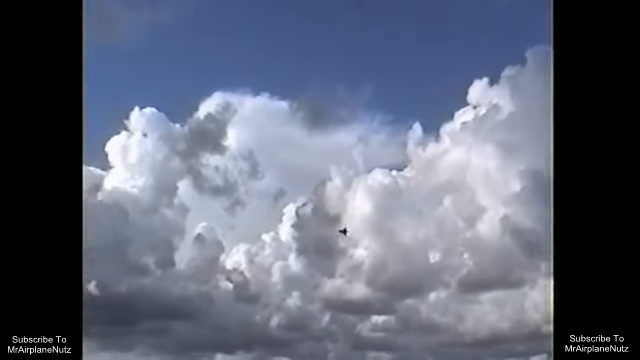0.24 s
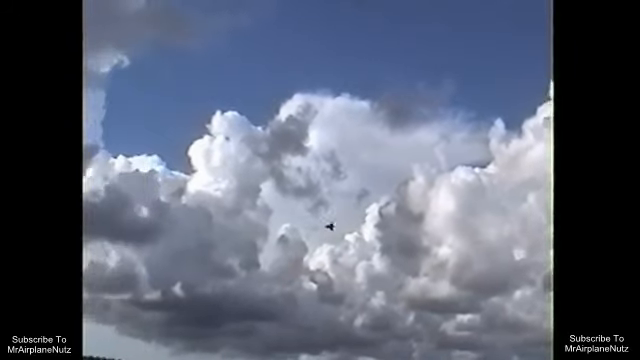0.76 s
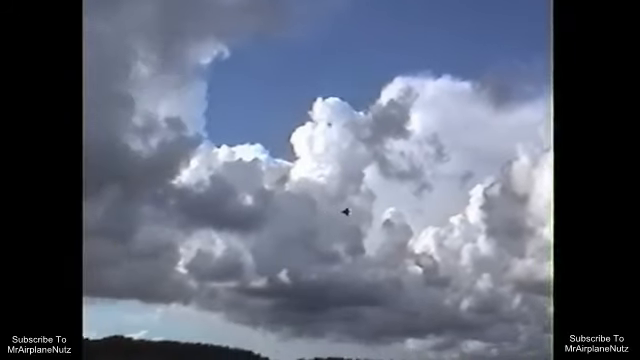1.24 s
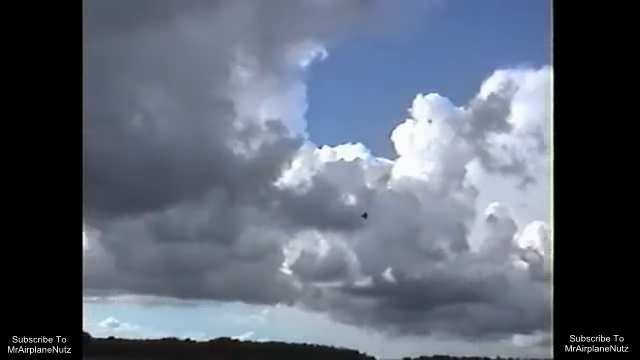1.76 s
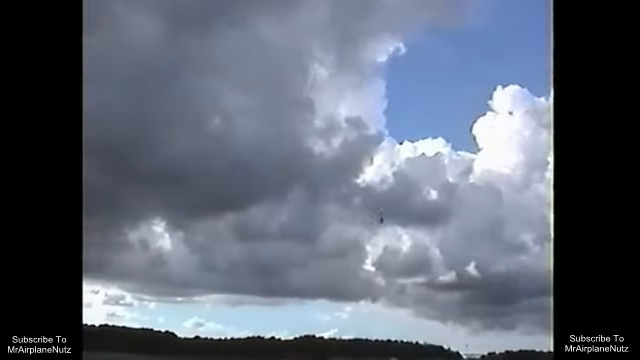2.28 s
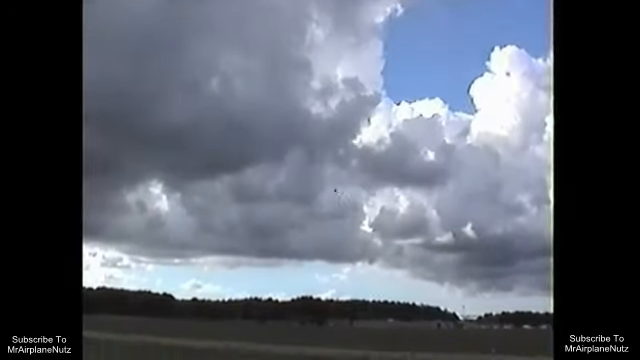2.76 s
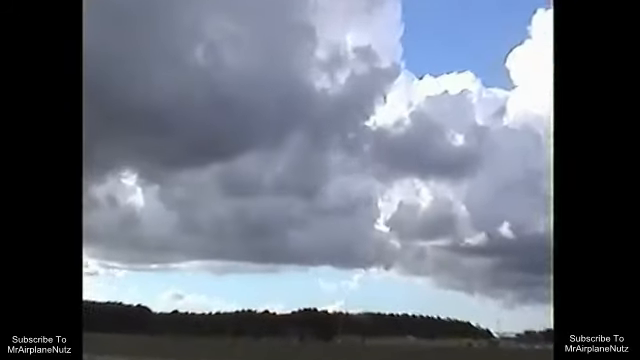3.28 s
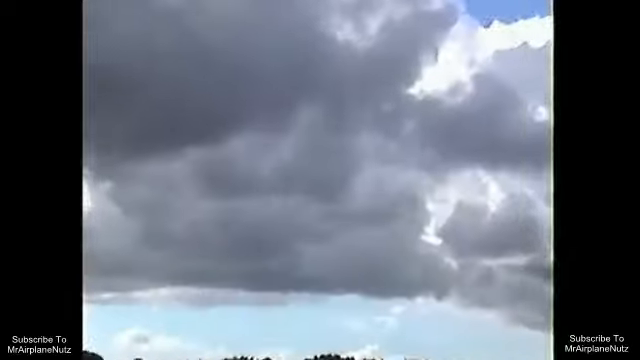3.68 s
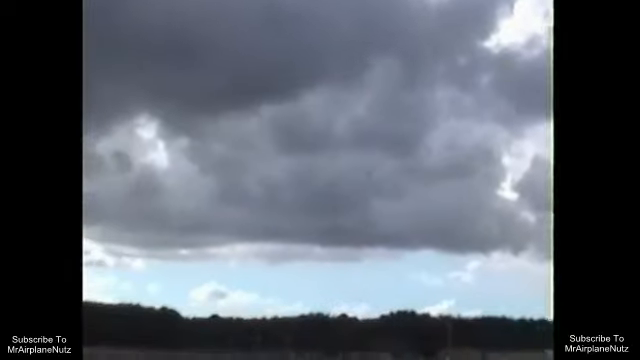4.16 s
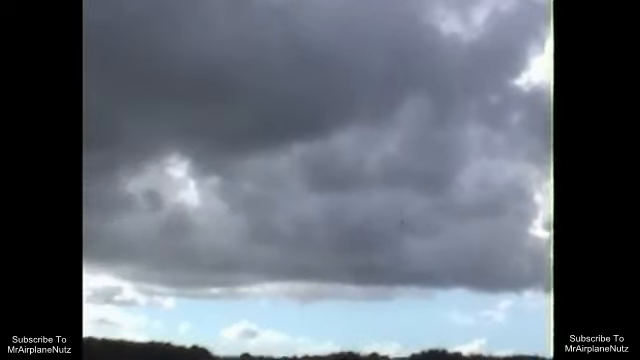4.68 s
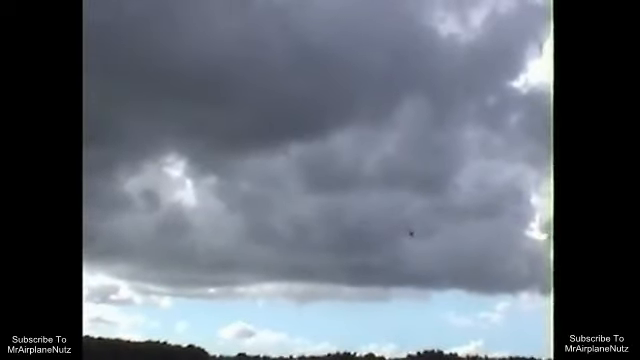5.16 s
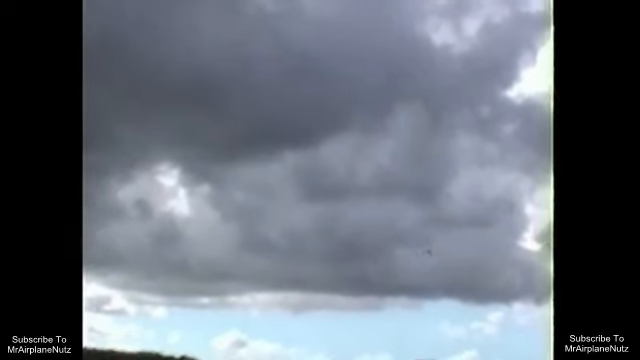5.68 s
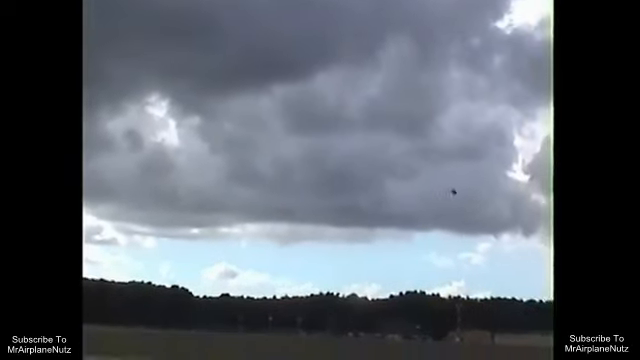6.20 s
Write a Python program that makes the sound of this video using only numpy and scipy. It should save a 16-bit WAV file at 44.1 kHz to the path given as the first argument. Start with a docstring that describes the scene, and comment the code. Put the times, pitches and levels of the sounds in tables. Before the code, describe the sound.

Outdoors on an open airfield, a single-engine jet fighter is already roaring at 0 seconds: dense, mid-heavy turbulent noise, with faint fizz and small sharp crackles from the overloaded microphone. Around 1.1 seconds it grows slightly louder and the colour turns broader and brighter, fluttering in gusty air. From 2 to 2.6 a narrow howl climbs through the roar, with a sharp crackle near 2.45, as the sound shifts to a fuller, rushing tail-on roar. At about 3.65 it jumps to its loudest, harsh and hissy, with thick crackle and two low thumps near 3.7 and 4.0. It drops after 4.1, then surges briefly around 5.05 with a cluster of snaps. From 5.3 to 6.4 it is quieter, darker and distant, still wavering. A weak breeze and very faint, high sinking whine lie underneath; peaks are squashed and extreme treble is missing.

```python
"""Over an open airfield, a single-engine jet fighter turns and draws away.
Its plume roars as shaped noise: the colour follows the angle it is heard from, and four registers surge in gusty air.
Narrow bands howl within the roar, and a breeze buffets the microphone.
The small microphone overloads with low thumps, sharp single crackles, a faint fizz and bouts of crackle.
A fast limiter holds the peaks, the recorder adds a thin, sinking whine, and the extreme top is cut off."""
import sys
import numpy as np
from scipy import signal
from scipy.fft import rfft, irfft, next_fast_len
from scipy.io import wavfile
from scipy.ndimage import uniform_filter1d, minimum_filter1d, map_coordinates

SR = 44100
rng = np.random.default_rng(int(sys.argv[2]) if len(sys.argv) > 2 else 0)


def wrap_up_sound(samples):
    """Save the sound to the file named by the first command line argument, as 16-bit audio."""
    columns = np.atleast_2d(samples).T
    # keep every value between -1 and 1, then stretch to whole-number steps
    tamed = np.clip(columns, -1, 1)
    steps = np.round(tamed * 32767).astype(np.int16)
    wavfile.write(sys.argv[1], SR, steps)


N = 283563
TIME = np.arange(N) / SR
PADDED = next_fast_len(N + 8192, real=True)
BINS = np.maximum(np.arange(PADDED // 2 + 1) * SR / PADDED, 1)   # Hz

# Colour of the breeze and the low thumps. Each row: frequency in Hz, relative level in dB per Hz.
LOW_COLOUR = [(40, -2.5), (130, 0.5), (300, -43)]
# Low thumps as the overloaded microphone bottoms out. Each row: centre in seconds, length in seconds, level in dB.
OVERLOAD_THUMPS = [(3.718, 0.095, -43), (3.993, 0.12, -42)]
# Sharp single crackles of the overloaded microphone. Each row: time in seconds, relative level in dB.
SHARP_CRACKLES = [(0.173, -30), (0.208, -44), (0.268, -28), (1.031, -32), (1.111, -33), (2.4515, -23),
                  (2.703, -40), (2.832, -36), (3.0826, -33), (3.411, -27), (3.424, -29), (4.3, -29),
                  (4.5506, -31), (4.583, -35), (4.974, -37), (5.0649, -34), (5.097, -26), (5.112, -29),
                  (5.139, -36), (6.2233, -44)]
# Colour of all the crackle. Each row: frequency in Hz, relative level in dB per Hz.
CRACKLE_COLOUR = [(2000, 9), (4000, 2.5), (5400, 3), (6200, -4.5), (7400, 1), (8300, -8), (9300, -5.5),
                  (10500, -12.5), (15500, -18.5)]
# Colour of the exhaust from four angles. Each row: frequency in Hz, relative level in dB per Hz.
NEARING_COLOUR = [(41, -74), (90, -36.5), (165, -11.5), (250, -28.5), (362, -22), (527, -10.5),
                  (1180, -1.5), (1460, -10.5), (1740, -9), (3140, -29.5), (3630, -36.5), (5000, -64),
                  (6500, -69)]
ABEAM_COLOUR = [(41, -62), (70, -45), (157, -18), (222, -24), (321, -19.5), (346, -14.5), (389, -11),
                (500, -3), (793, -0.5), (1020, -4.5), (1280, -3), (2720, -19.5), (3180, -20), (7000, -54),
                (9100, -74)]
LEAVING_COLOUR = [(41, -67), (70, -38.5), (122, -21.5), (205, -21), (285, 0), (437, 12), (618, 2.5),
                  (841, 3.5), (1080, 0), (1310, -1), (1590, -4.5), (2380, -13.5), (3000, -13.5),
                  (4160, -26.5), (7000, -45.5), (9100, -73)]
FAR_COLOUR = [(41, -44), (70, -23.5), (134, -12.5), (199, -18.5), (273, -2.5), (426, 2), (468, 0.5),
              (818, -10), (1020, -10.5), (1660, -15.5), (2800, -23.5), (3630, -33.5), (6000, -64),
              (7800, -96)]
# The jet swings from one angle to the next. Each row: middle in seconds, duration in seconds.
ANGLE_TURNS = [(1.142, 0.2), (2.4, 0.5), (5.171, 0.7)]
# Howling swells in the roar. Each row: start and end in seconds, start and end pitch in Hz, relative level in dB.
HOWL_GLIDES = [(0.323, 0.66, 515, 501.4, -34), (2.002, 2.291, 595, 811, -29), (2.407, 2.5, 955, 955, -19.5),
               (2.554, 2.61, 1120, 888, -18.5), (3.035, 3.223, 466, 384, -32.5),
               (3.615, 3.723, 322, 415, -22), (4.422, 4.532, 443.5, 464, -25.5),
               (4.777, 4.865, 830, 920, -29.5), (5.03, 5.126, 917, 898, -25)]
# Response of the microphone in its housing. Each row: frequency in Hz, gain in dB.
MICROPHONE_RESPONSE = [(400, -2), (530, 1.5), (630, -4), (760, 5), (1000, 5), (1300, 4), (1550, -2),
                       (2300, -3), (3300, 0.2), (4100, -1), (5200, 3.5), (6100, -1.5), (9000, -3.5)]
# Slow loudness of the jet as it passes and draws away. Each row: time in seconds, level in dB.
JET_LOUDNESS = [(0, -21.5), (0.3, -22.5), (1.15, -19.5), (2.3, -21), (2.7, -20.5), (3.61, -22.5),
                (3.66, -16.5), (4.095, -17), (4.125, -21.5), (4.3, -24.5), (4.33, -25), (4.95, -22.5),
                (5.06, -17.5), (5.28, -23), (5.32, -26.5), (5.76, -26), (6.02, -27.5), (6.43, -26.5)]
# Bass of the jet, weakest while it is side-on. Each row: time in seconds, level in dB.
JET_BASS = [(0, -37.5), (0.6, -35.5), (1.6, -50.5), (3.25, -45.5), (3.75, -35.5), (4.4, -40), (5.5, -42.5),
            (6.43, -36.5)]
# Treble of the jet. Each row: time in seconds, level in dB.
JET_TREBLE = [(0, -36.5), (0.74, -39), (0.78, -33), (1.14, -35.5), (1.255, -35.5), (1.285, -32),
              (1.85, -30), (2.3, -26.5), (3.1, -31), (3.78, -26.5), (4.07, -25.5), (4.2, -31),
              (4.42, -34.5), (5.14, -33.5), (5.17, -40.5), (5.75, -43), (6.43, -39)]
# Moving air focuses or scatters one register for a moment.
# Each row: centre in seconds, length in seconds, centre frequency in Hz, gain in dB.
AIR_SURGES = [(0.182, 0.054, 450, -3), (0.44, 0.036, 1000, 6.5), (0.494, 0.059, 140, 11.5),
              (0.735, 0.079, 850, -8), (1.106, 0.045, 160, 11), (1.23, 0.032, 650, 6),
              (1.34, 0.055, 140, 7), (1.34, 0.06, 395, -5), (1.332, 0.085, 1840, 10),
              (1.412, 0.027, 450, 5), (1.683, 0.13, 2600, 4.5), (2.04, 0.061, 1850, 4.5),
              (2.057, 0.068, 140, 6.5), (2.28, 0.055, 398, -7), (2.315, 0.035, 1770, 8.5),
              (2.83, 0.066, 620, 8.5), (2.927, 0.02, 450, -20), (3.06, 0.042, 980, 8),
              (3.14, 0.2, 2420, -5.5), (3.225, 0.027, 400, -10), (3.516, 0.036, 397, 9.5),
              (3.845, 0.042, 1000, -7.5), (3.917, 0.066, 900, 3), (4.276, 0.042, 1550, 9),
              (4.485, 0.14, 1000, -6), (4.56, 0.14, 400, 8), (4.6, 0.022, 1550, 9),
              (4.705, 0.012, 1680, 11), (4.807, 0.021, 1770, 6), (4.877, 0.017, 2600, 5),
              (4.974, 0.029, 800, -7), (5.018, 0.013, 2600, 4.5), (5.105, 0.025, 1250, 9.5),
              (5.15, 0.22, 380, 1.5), (5.425, 0.16, 1500, 6.5), (5.756, 0.19, 400, -11),
              (6.044, 0.048, 680, 14.5), (6.122, 0.0076, 400, 12)]
# Faint steady fizz in the first second, then bouts of crackle from the overloaded microphone.
# Each row: start in seconds, length in seconds, relative level in dB.
FIZZ_AND_BOUTS = [(0, 0.99, -67.5), (0.146, 0.16, -55.5), (0.506, 0.1, -65), (1.012, 0.14, -57),
                  (2.313, 0.033, -58), (2.41, 0.04, -51.5), (3.514, 0.64, -53), (3.657, 0.186, -43.5),
                  (3.72, 0.032, -38.5), (3.87, 0.078, -44), (3.977, 0.13, -49), (4.223, 0.085, -59),
                  (5.06, 0.11, -65), (5.922, 0.072, -66)]

# centres of the rumble, roar, rush and hiss, and the edges between them
REGISTERS_HZ = (140, 400, 1000, 2600)
ROAR_FROM_HZ, RUSH_FROM_HZ, HISS_FROM_HZ = 220, 620, 1600
SURGE_OCTAVES = 0.48   # spread of each surge around its centre
# brightness is treble against loudness; roar and rush each have an offset in dB and a slope in dB per dB
USUAL_BRIGHTNESS_DB = -12
ROAR_DB, ROAR_PER_BRIGHTNESS = -3.5, -0.39
RUSH_DB, RUSH_PER_BRIGHTNESS = -5.5, 0.39
# faint crackle: relative dB at the usual treble level, and dB per dB of treble
USUAL_TREBLE_DB = -30
FAINT_CRACKLE_DB, CRACKLE_PER_TREBLE = -60.5, 1.2
RISE_SHARE, FALL_S = 0.3, 0.014   # of the fizz and each bout; the rise is a share of the length
CUTOFF_HZ = 15750


def from_db(db):
    """Turn decibels into gain."""
    return 10 ** (np.asarray(db) / 20)


def in_time(rows):
    """Draw a (seconds, dB) curve at every sample."""
    s, db = np.transpose(rows)
    return np.interp(TIME, s, db)


def filtered(x, gain):
    """Apply a gain at each frequency, with the ends mirrored."""
    lead = (PADDED - N) // 2
    padded = np.pad(x, (lead, PADDED - N - lead), "reflect")
    return irfft(rfft(padded) * gain, PADDED)[lead:lead + N]


def coloured(x, spectrum):
    """Filter by a (Hz, dB) outline and bring the spread to 1."""
    hz, db = np.transpose(spectrum)
    y = filtered(x, from_db(np.interp(np.log(BINS), np.log(hz), db)))
    return y / y.std()


def split(x, hz):
    """Part the sound steeply into what lies below and above a frequency."""
    low = filtered(x, 1 / (1 + (BINS / hz) ** 10))
    return low, x - low


def levelled(x, span_s):
    """Even out the sound so its running rms stays near 1."""
    size = max(int(span_s * SR), 8)
    power = uniform_filter1d(uniform_filter1d(x ** 2, size), size)
    return x / np.sqrt(np.abs(power) + 1e-9)


def drift(rate):
    """Slow chance, changing about rate times a second; spread 1."""
    size, per_s = 8192, 1000
    hz = np.arange(size // 2 + 1) * per_s / size
    slow = irfft(rfft(rng.standard_normal(size)) / (1 + (hz / rate) ** 2))
    return np.interp(TIME, np.arange(size) / per_s, slow / slow.std())


def lumps(rate):
    """Chance flips between lumps and gaps, from -1 to 1."""
    return np.tanh(2 * drift(rate))


def swell(s, length_s):
    """A bell-shaped rise and fall of height 1 around a moment."""
    return np.exp(-2 * ((TIME - s) / length_s) ** 2)


def decaying(impulses, decay_s):
    """Give every impulse an exponential tail."""
    return signal.lfilter([1], [1, -np.exp(-1 / (decay_s * SR))], impulses + 1e-18)


def whine(hz, level_db, fade_db_per_s):
    """The recorder's own thin whine: a pure tone that sinks steadily."""
    return from_db(level_db - fade_db_per_s * TIME) * np.sin(2 * np.pi * hz * TIME)


def breeze_and_thumps(breeze_db, lull_db, lull_s, lull_length_s):
    """Low noise: a breeze with one long lull, and thumps as the overloaded microphone bottoms out."""
    breeze = from_db(breeze_db + lull_db * swell(lull_s, lull_length_s))
    thumps = sum(from_db(db) * swell(s, length) for s, length, db in OVERLOAD_THUMPS)
    return coloured(rng.standard_normal(N), LOW_COLOUR) * (breeze + thumps)


def sharp_crackles(decay_s, level_db, top_hz):
    """Single crackles of the overloaded microphone: noise bursts of a few milliseconds, duller than the bouts."""
    onsets = np.zeros(N)
    for s, db in SHARP_CRACKLES:
        onsets[int(s * SR)] = from_db(db + level_db)
    noise = coloured(rng.standard_normal(N), CRACKLE_COLOUR)
    return decaying(onsets, decay_s) * filtered(noise, 1 / (1 + (BINS / top_hz) ** 2))


def crackle_strength():
    """Faint crackle follows the jet's treble; the early fizz and each bout swell in, hold and fall quickly."""
    above_usual = in_time(JET_TREBLE) - USUAL_TREBLE_DB
    strength = from_db(FAINT_CRACKLE_DB + CRACKLE_PER_TREBLE * above_usual)
    for s, length, db in FIZZ_AND_BOUTS:
        rise = (TIME - s) / (RISE_SHARE * length)
        fall = (s + length - TIME) / FALL_S
        strength = strength + from_db(db) * np.clip(np.minimum(rise, fall) + .5, 0, 1)
    return strength


def overload(x, headroom, fizz, sputter_db, level_db):
    """The microphone bottoms out on deep negative swings; each flattened trough spits treble."""
    flattened = np.tanh(2 * np.maximum(-levelled(x, span_s=0.038) - headroom, 0))
    # fizz keeps a little noise between troughs
    spit = coloured((flattened + fizz) * rng.standard_normal(N), CRACKLE_COLOUR)
    # the spits come in clumps
    clumps_db = sputter_db * lumps(rate=45)
    return levelled(spit, span_s=0.11) * crackle_strength() * from_db(level_db + clumps_db)


def limiter(x, ceiling, hold_s):
    """The gain ducks for a few milliseconds around each peak over the ceiling."""
    size = max(int(hold_s * SR), 8)
    gain = minimum_filter1d(ceiling / np.maximum(np.abs(x), ceiling), 2 * size)
    return x * uniform_filter1d(uniform_filter1d(gain, size), size)


def howls(width_hz, level_db):
    """Narrow bands of the roar swell, glide and fade: slow chance carried on a gliding pitch."""
    out = np.zeros(N)
    for start, end, start_hz, end_hz, db in HOWL_GLIDES:
        progress = np.clip((TIME - start) / (end - start), 0, 1)
        phase = 2 * np.pi * np.cumsum(start_hz + progress * (end_hz - start_hz)) / SR
        band = drift(width_hz) * np.cos(phase) + drift(width_hz) * np.sin(phase)
        out += levelled(band, span_s=0.35) * np.sin(np.pi * progress) * from_db(db + level_db)
    return out


def swaying(x, share, rate):
    """Gusts stretch and squeeze the travel time, so resonances slide by about a share of their pitch."""
    position = np.arange(N) + np.cumsum(share * drift(rate))
    return map_coordinates(x, [position], order=3, mode="reflect")


def wavering(x, depth, rate, shortest_s, longest_s):
    """Sound takes several paths through uneven air; their shifting shares carve passing peaks and dips."""
    lags = np.geomspace(shortest_s, longest_s, num=7) * rng.uniform(.85, 1.15, size=7)
    return x + depth * sum(drift(rate) * np.roll(x, int(lag * SR)) for lag in lags)


def surges_db(hz):
    """Moving air lifts or dips one register; each surge spans about an octave around its centre."""
    total = 0
    for s, length, centre, db in AIR_SURGES:
        octaves = np.log2(hz / centre)
        total = total + db * swell(s, length) * np.exp(-.5 * (octaves / SURGE_OCTAVES) ** 2)
    return total


def register_levels(wander_db, wander_rate):
    """Rumble, roar, rush and hiss in dB; the brighter the jet, the more its roar gives way to rush."""
    loudness, treble, bass = in_time(JET_LOUDNESS), in_time(JET_TREBLE), in_time(JET_BASS)
    brightness = treble - loudness - USUAL_BRIGHTNESS_DB
    roar = loudness + ROAR_DB + ROAR_PER_BRIGHTNESS * brightness
    rush = loudness + RUSH_DB + RUSH_PER_BRIGHTNESS * brightness
    return [db + surges_db(hz) + wander_db * drift(wander_rate)
            for db, hz in zip((bass, roar, rush, treble), REGISTERS_HZ)]


def shocks(per_s, decay_s):
    """Shock fronts arrive at random, rise in about a millisecond and die away; mean 0, spread 1."""
    fronts = (rng.random(N) < per_s / SR) * rng.uniform(0.31, 1, N)
    tails = np.tanh(decaying(fronts, decay_s))
    tails = uniform_filter1d(uniform_filter1d(tails, size=30), size=30)
    return (tails - tails.mean()) / tails.std()


def exhaust():
    """Turbulent mixing noise; each angle's colour hands over to the next at equal power."""
    noise = coloured(rng.standard_normal(N), NEARING_COLOUR)
    for (s, duration), colour in zip(ANGLE_TURNS, (ABEAM_COLOUR, LEAVING_COLOUR, FAR_COLOUR)):
        angle = np.pi / 2 * np.clip((TIME - s) / duration + .5, 0, 1)
        noise = np.cos(angle) * noise + np.sin(angle) * coloured(rng.standard_normal(N), colour)
    return noise


def jet(flutter_db, hiss_flutter_db, tear_db):
    """Four registers sound together, each with its own level; the air makes the short waves flutter most."""
    rumble_db, roar_db, rush_db, hiss_db = register_levels(wander_db=1.77, wander_rate=1.53)
    swayed = swaying(exhaust(), share=0.04, rate=4)
    heard = wavering(swayed, depth=0.17, rate=9.3, shortest_s=0.001249, longest_s=.011)
    rumble, rest = split(coloured(heard, MICROPHONE_RESPONSE), ROAR_FROM_HZ)
    roar, rest = split(rest, RUSH_FROM_HZ)
    rush, hiss = split(rest, HISS_FROM_HZ)
    flutter = lumps(rate=22)
    # steep wavefronts from the plume tear at the top of the roar
    tearing_db = tear_db * shocks(per_s=110, decay_s=0.0019)
    rush_db = rush_db + .5 * tearing_db + flutter_db * flutter
    hiss_db = hiss_db + tearing_db + hiss_flutter_db * flutter
    return (levelled(rumble, span_s=0.09) * from_db(rumble_db)
            + levelled(roar, span_s=0.089) * from_db(roar_db)
            + levelled(rush, span_s=0.054) * from_db(rush_db)
            + levelled(hiss, span_s=0.012) * from_db(hiss_db))


def scene():
    """The jet with its howls, the breeze, and the microphone's thumps and sharp crackles."""
    low = breeze_and_thumps(breeze_db=-52.0, lull_db=-11.5, lull_s=3.46, lull_length_s=2.3)
    sharp = sharp_crackles(decay_s=0.0028, level_db=-0.5, top_hz=10000)
    plume = jet(flutter_db=0.98, hiss_flutter_db=1.72, tear_db=1.5) + howls(width_hz=48, level_db=3.5)
    return (plume + low + sharp)[None]


def record(dry):
    """Fizz and bouts of overload, whine, limiter and a steep top cut."""
    x = dry[0] + overload(dry[0], headroom=1.88, fizz=0.17, sputter_db=3.0, level_db=6.0)
    x = x + whine(hz=15630, level_db=-79.0, fade_db_per_s=1)
    x = limiter(x, ceiling=0.35, hold_s=0.0006)
    top_cut = np.clip((CUTOFF_HZ - BINS) / 100, 0, 1)
    return filtered(x, top_cut)[None]


dry = scene()
out = record(dry)
wrap_up_sound(out)
```